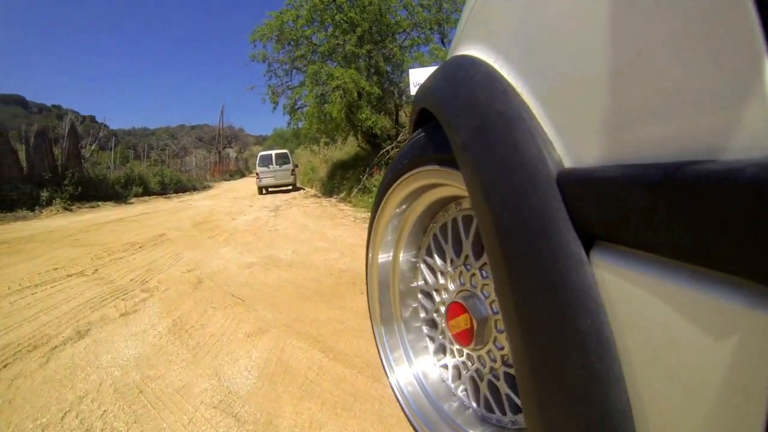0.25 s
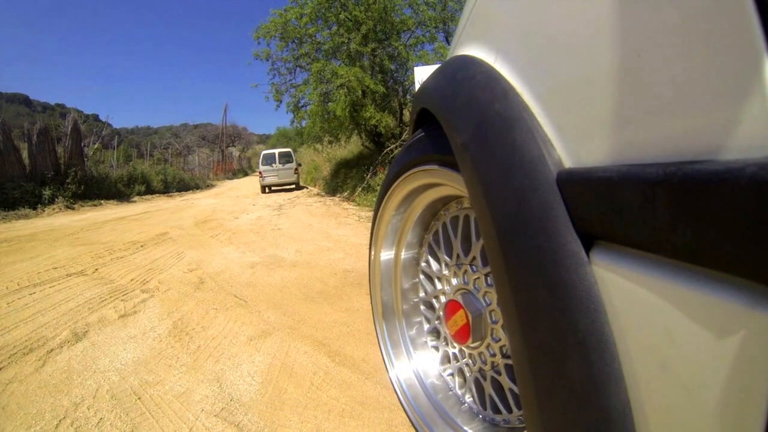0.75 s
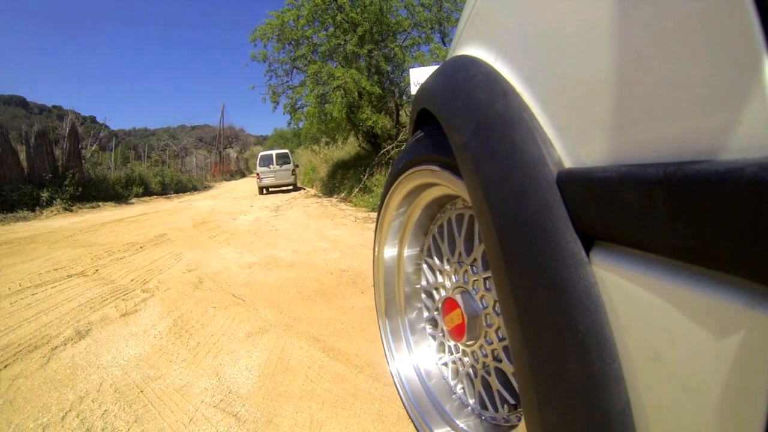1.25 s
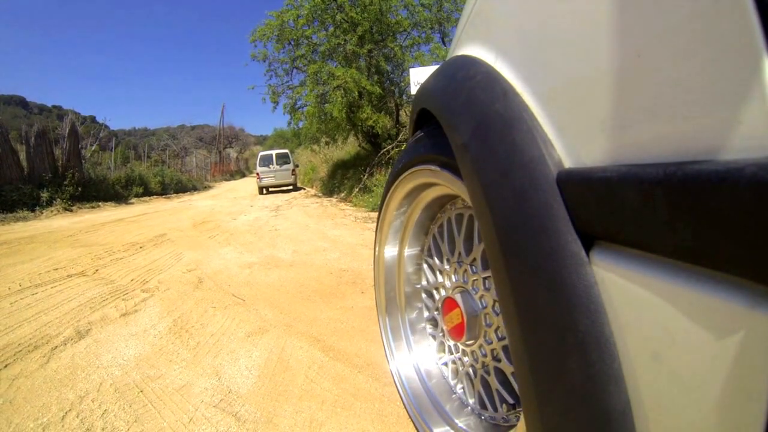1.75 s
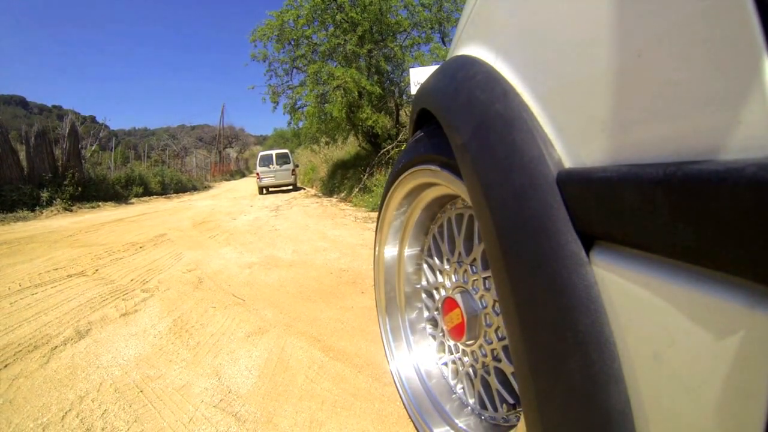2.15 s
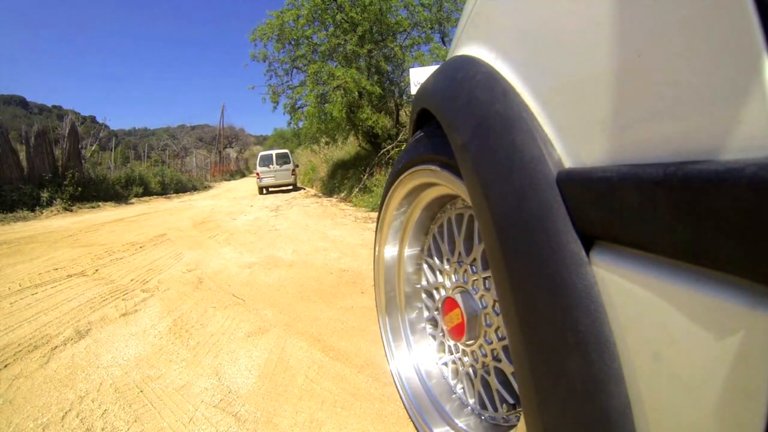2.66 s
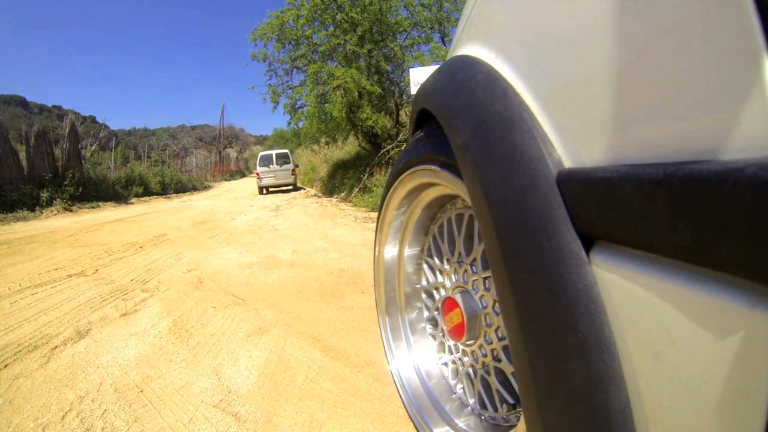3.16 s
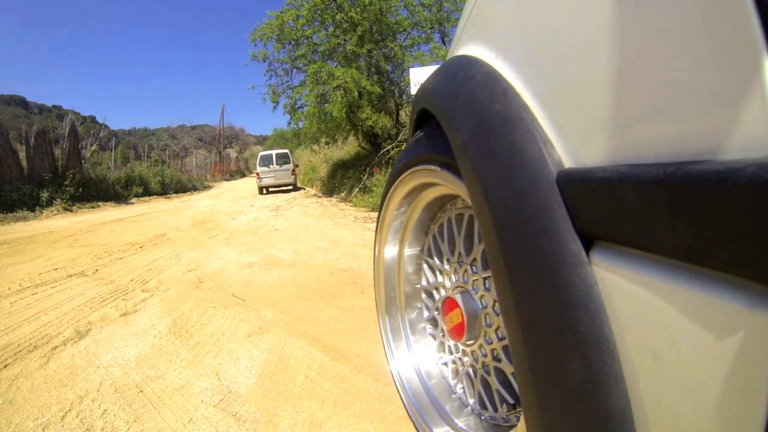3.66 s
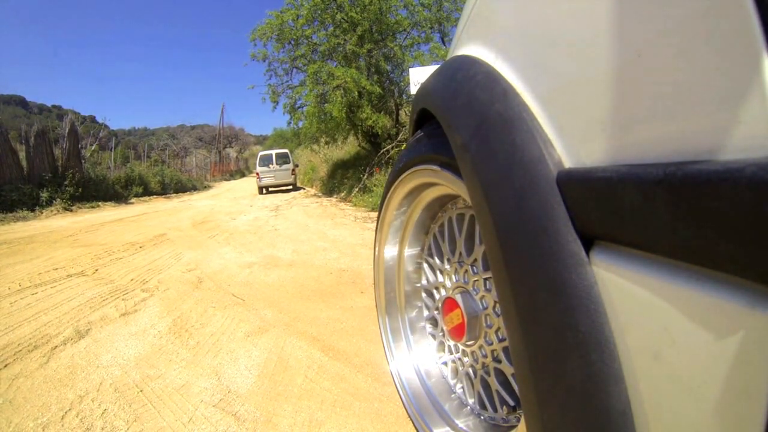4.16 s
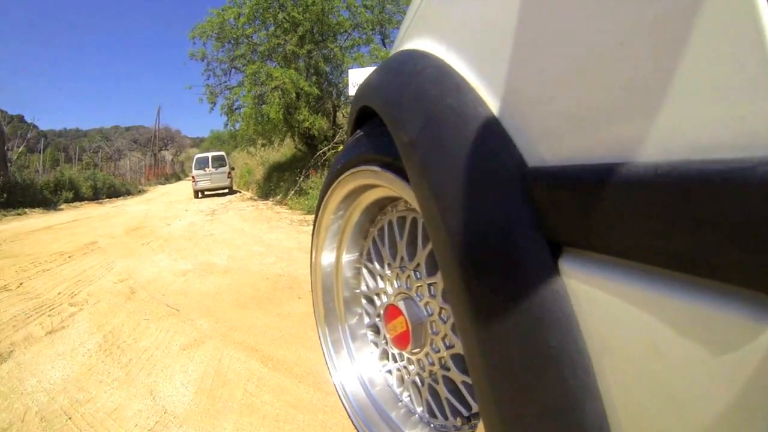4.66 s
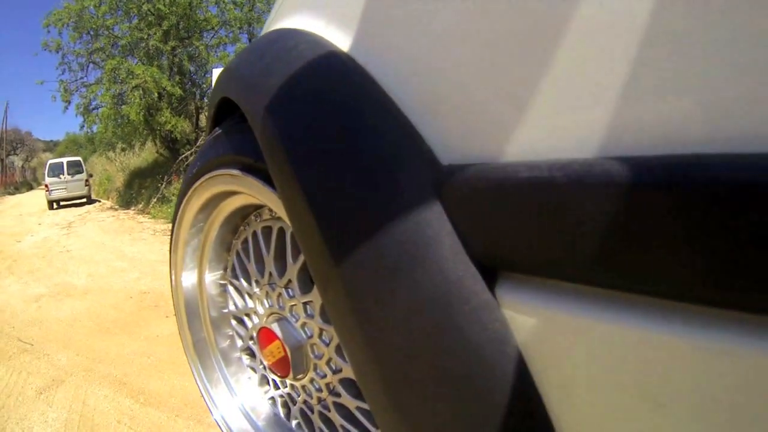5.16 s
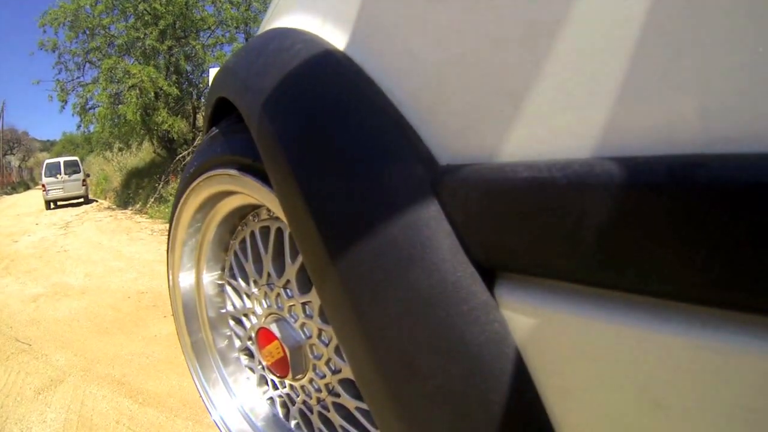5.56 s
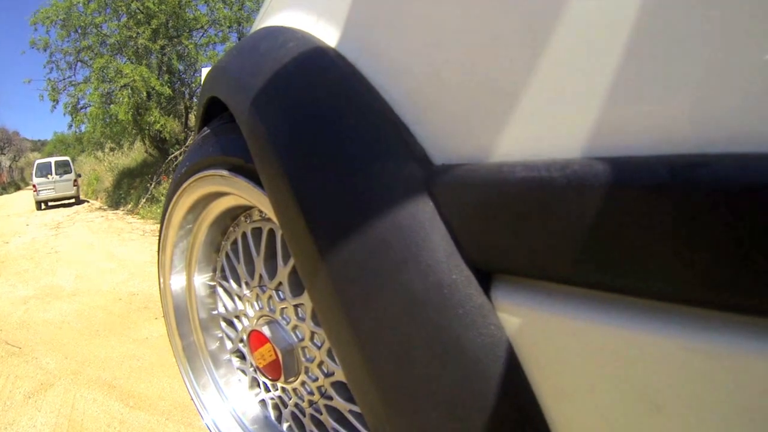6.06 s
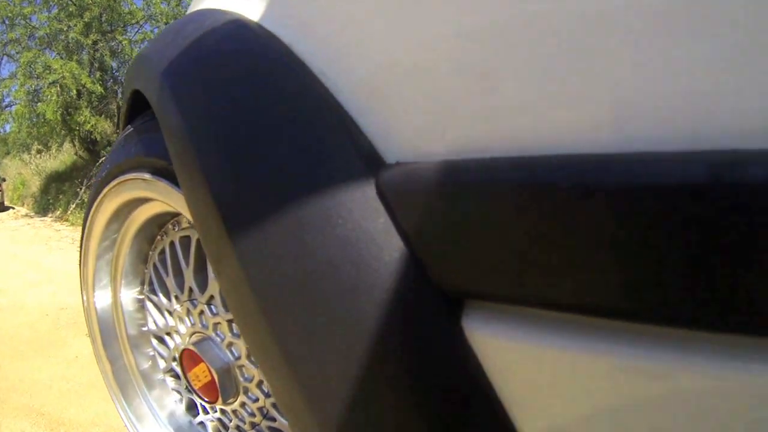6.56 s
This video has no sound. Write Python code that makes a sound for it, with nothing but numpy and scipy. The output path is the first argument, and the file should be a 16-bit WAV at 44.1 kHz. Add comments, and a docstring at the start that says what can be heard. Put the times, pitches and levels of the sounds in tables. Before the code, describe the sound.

Heard close to the wheel, a slow car rumbles along a sandy track, thumping and clattering over a rough patch before settling.

```python
"""A car creeps along a dirt road, heard from a cased camera fixed to its side, close to a wheel.
The engine throbs low from the start, under the camera's faint hiss and thin pulsing whine.
After one dab of throttle the tyres scrub into loose sand, about a second in; ruts begin to thump
the body and the camera mount knocks. From 3.5 s the road is roughest: the mount rattles, gravel
scrapes and pebbles tap the wheel arch. By 6 s the car is rolling quietly at idle."""
import sys
import numpy as np
from scipy import signal
from scipy.fft import rfft, irfft
from scipy.io import wavfile
from scipy.ndimage import uniform_filter1d

SR = 44100
rng = np.random.default_rng(int(sys.argv[2]) if len(sys.argv) > 2 else 0)


def wav_out(sig):
    """Save sig, one row per channel (or a flat mono array), as 16-bit PCM at SR to the path in sys.argv[1]."""
    wavfile.write(sys.argv[1], SR, np.round(np.clip(np.atleast_2d(sig).T, -1, 1) * 32767).astype(np.int16))


N = 300850
TIME = np.arange(N) / SR
IDLE_HZ = 27.41  # firings per second

# Ruts under the wheel. Each row: start in seconds, level in dB, centre of the blow in Hz.
RUTS = [(1.276, -31.5, 103), (1.455, -40, 103), (1.68, -36.5, 111), (1.825, -31.5, 96), (1.857, -31.5, 95),
        (1.963, -35.5, 88), (2.183, -37.5, 105), (3.185, -36, 89), (3.255, -35.5, 93), (3.317, -39.5, 96),
        (3.555, -19.5, 152.5), (3.567, -23, 210), (3.737, -32.5, 97.5), (3.881, -35, 113),
        (4.059, -36.5, 104.9), (4.277, -22.5, 110.7), (4.3037, -20.5, 107.3), (4.379, -33, 87),
        (4.644, -29, 97), (4.704, -34, 96), (4.973, -30, 92), (5.048, -32, 218), (5.072, -33.5, 97),
        (5.307, -37.5, 226)]
# The hollow lows and clacking mids of the camera case. Each row: frequency in Hz, level in dB.
HOLLOW_SPECTRUM = [(150, -20.5), (300, 4.5), (380, 0), (450, 7), (520, -7), (620, 0.5), (700, 2.5),
                   (830, -11.5), (950, -13.5), (1200, -21.5)]
CLACK_SPECTRUM = [(700, -32.5), (1020, -6), (1240, 9.5), (1400, 7), (1520, 5.5), (1620, 5), (1800, -9.5),
                  (1960, -1.5), (2300, -16.5), (2800, -47)]


def amp(db):
    """Decibels to gain."""
    return 10 ** (np.asarray(db) / 20)


def unit(x):
    """Scales to rms 1."""
    return x / np.sqrt(np.mean(x ** 2) + 1e-20)


def curve(rows):
    """Joins (seconds, value) points, sample by sample."""
    return np.interp(TIME, *np.transpose(rows))


def add(mix, start_s, sound):
    """Mixes a sound in at its start time."""
    part = mix[max(round(start_s * SR), 0):][:len(sound)]
    part += sound[:len(part)]


def colour(x, spectrum, size=4096):
    """Causal filter of unit energy with the given spectrum, falling steeply beyond its ends."""
    hz, db = np.transpose(spectrum)
    f = abs(np.fft.fftfreq(size, 1 / SR)) + 1
    octaves_out = np.maximum(np.log2(hz[0] / f), 0) + np.maximum(np.log2(f / hz[-1]), 0)
    log_gain = np.log(amp(np.interp(np.log(f), np.log(hz), db) - 20 * octaves_out))
    minimum_phase = np.exp(signal.hilbert(log_gain).conj())
    taps = np.fft.ifft(minimum_phase).real[:size // 2]
    return signal.fftconvolve(x, taps / np.linalg.norm(taps))[:len(x)]


def waver(rate_hz):
    """Random drift of rms 1, mostly slower than the given rate."""
    f = np.fft.rfftfreq(N, 1 / SR)
    return unit(irfft(rfft(rng.standard_normal(N)) / (1 + (f / rate_hz) ** 4), N))


def ring(modes, t):
    """Sum of dying modes, each given as Hz, dB and t60 in seconds."""
    return sum(amp(db) * np.exp(-np.log(1000) * t / t60) * np.sin(2 * np.pi * hz * t)
               for hz, db, t60 in modes)


def grains(per_s, spread_db):
    """Random clicks of uneven size."""
    size = amp(spread_db * np.minimum(rng.exponential(1, N), 5))
    return unit(size * rng.standard_normal(N) * (rng.random(N) < per_s / SR))


def firing_rate(top_s=.56, up_s=.45, down_s=.7, rise_hz=7.6, hunt_hz=.3):
    """The idle hunts a little, with one smooth rise and fall under the throttle."""
    dab = np.interp(TIME, [top_s - up_s, top_s, top_s + down_s], [-1, 0, 1])
    return IDLE_HZ + rise_hz * np.cos(np.pi / 2 * dab) ** 2 + hunt_hz * waver(2.5)


def engine(boom_hz=93.6, boom_width_hz=30.8):
    """Orders of the firing rate, no two firings quite equal, over muffled engine bay noise."""
    # The deep throb: the engine's firing, plus the body's heave in the deep rut near 4.3 s.
    # Each row: time in seconds, level in dB.
    throb_levels = [(0.0, -42.5), (0.36, -50.5), (0.46, -38), (1.37, -46.5), (2.05, -46), (2.09, -51),
                    (2.85, -42.5), (3.32, -51), (4.21, -41), (4.33, -29.5), (4.48, -46.5), (5.01, -40),
                    (5.17, -53), (5.26, -42.5), (6.19, -43), (6.53, -53), (6.65, -45.5), (6.82, -46.5)]
    # Engine load. Each row: time in seconds, level of the second order in dB.
    load_levels = [(0, -60.5), (.75, -62), (1.05, -58), (2.05, -57.5), (2.3, -58), (2.9, -55.5), (3.5, -58),
                   (4.3, -51), (4.9, -64), (6.82, -68)]
    # Orders that boom in the body, and fainter ones that hum. Each row: order, level in dB.
    drone_orders = [(3, 2.5), (4, -2), (5, -8)]
    hum_orders = [(6, -82.5), (7, -82), (8, -79), (10, -92.5), (11, -78.5), (13, -82), (15, -81.5)]
    # Noise of the engine bay. Each row: frequency in Hz, level in dB.
    bay_spectrum = [(200, -1.5), (330, 5), (430, -2), (520, -2.5), (700, -3), (950, -11), (1400, -15.5),
                    (1900, -13.5)]
    hz = firing_rate()
    angle = 2 * np.pi * np.cumsum(hz) / SR
    load_db = curve(load_levels)
    tones = amp(curve(throb_levels) + 1.9 * waver(6.4)) * np.sin(angle + .2 * waver(21))
    tones += amp(load_db + 2 * waver(4.3)) * np.sin(2 * angle + .22 * waver(1.3))
    drone_db = -55 + .55 * (load_db + 59.5)  # follows about half the load's swing
    for order, db in drone_orders:
        boom = 1 / np.hypot(1, 2 * (order * hz - boom_hz) / boom_width_hz)  # the body's resonance
        wave = np.sin(round(order) * angle + .5 * waver(7))
        tones += boom * amp(db + drone_db + 2 * waver(12)) * wave
    fade_db = -1.2 * np.maximum(hz - IDLE_HZ, 0)  # the hum fades as the engine speeds up
    for order, db in hum_orders:
        gain = amp(db + fade_db + 2 * waver(9.9))
        tones += gain * np.sin(round(order) * angle + 2 * np.pi * rng.random() + .41 * waver(21))
    bay = colour(rng.standard_normal(N) * (1 + .093 * np.cos(angle)), bay_spectrum)
    bay_db = -74.5 + .18 * (hz - IDLE_HZ)
    return np.sqrt(2) * tones + amp(bay_db) * bay


def camera(pulse_hz=14.984, hiss_db=-81):
    """Even hiss, and an electronic whine with its octave that pulses on and off."""
    # The camera's own hiss. Each row: frequency in Hz, level in dB.
    hiss_spectrum = [(1000, -1.5), (2500, -2.5), (4000, -7), (6000, -11), (8000, -14.5), (11500, -17.5),
                     (13500, -20.5), (14500, -33)]
    cycle = (TIME * pulse_hz + .07) % 1
    gate = uniform_filter1d((cycle < .55) * 1., size=90) * amp(2.3 * waver(60))
    whine_hz = 7490 - 110 * cycle + 35 * waver(200)
    angle = 2 * np.pi * np.cumsum(whine_hz) / SR
    whine = gate * (amp(-92.5) * np.sin(angle) + amp(-82.5) * np.sin(2 * angle))
    return whine + amp(hiss_db) * colour(rng.standard_normal(N), hiss_spectrum)


def tyres(shake, patch_s=1.1462, hold_s=.52, rise_db_per_s=78, fade_db_per_s=13.5):
    """Lumps in the dirt shake the body; crushed sand scrubs in the case's resonance."""
    # Road rumble and sand scrub. Each row: frequency in Hz, level in dB.
    rumble_spectrum = [(24, -2), (40, 4.5), (65, 3), (84, 12.5), (98, 16.5), (115, 10), (172, -6.5),
                       (222, 4.5), (270, -9), (450, -18), (560, -13.5), (700, -25.5), (950, -34)]
    scrub_spectrum = [(300, -19.5), (550, -17.5), (790, -12.5), (1000, -13), (1200, 1.5), (1400, 3),
                      (1620, -5.5), (1850, -23.5), (2170, -12.5), (2500, -36.5), (3600, -33.5),
                      (4300, -49.5)]
    patch_db = -57.5 - rise_db_per_s * np.maximum(patch_s - TIME, 0)  # into a patch of loose sand
    patch_db -= fade_db_per_s * np.maximum(TIME - patch_s - hold_s, 0)
    # Steady rolling, the patch and the shake from the ruts add in power.
    scrub_gain = amp(-1.5) * np.sqrt(amp(-73) ** 2 + amp(patch_db) ** 2 + (amp(-13) * shake) ** 2)
    rumble_gain = amp(10) * np.sqrt(amp(-71) ** 2 + amp(patch_db - 15) ** 2 + shake ** 2)
    lumps = colour(grains(per_s=1500, spread_db=2.2), rumble_spectrum) * amp(2.2 * waver(20))
    sand = colour(grains(per_s=8000, spread_db=.75), scrub_spectrum) * amp(1.2 * waver(18))
    return rumble_gain * lumps + scrub_gain * sand


def shudder(rise_s=.013, decay_s=.14):
    """Envelope of the car's shaking: each rut starts it in proportion to its blow, and it dies away."""
    power = np.zeros(N)
    for start_s, db, _ in RUTS:
        t = np.maximum(TIME - start_s, 0)
        power += (amp(db) * (1 - np.exp(-t / rise_s)) * np.exp(-t / decay_s)) ** 2
    return amp(-28.5) * np.sqrt(power)


def rut_thumps():
    """Each rut rings the body modes nearest to the centre frequency of its blow."""
    # Modes of body and tyre. Each row: frequency in Hz, level in dB, t60 in seconds.
    body_modes = [(62.3, -15.5, 0.1), (90.5, -4.5, 0.3), (98.3, 7.5, .24), (122, -4.5, 0.13),
                  (143.3, 0.5, 0.13), (203.9, 4.5, 0.29), (220.6, 6.5, 0.21), (310, -22, 0.4),
                  (442, -17, 0.15)]
    out, t = np.zeros(N), np.arange(SR // 2) / SR
    for start_s, db, centre_hz in RUTS:
        modes = [(hz, level - 15.2 * np.log2(hz / centre_hz) ** 2, t60) for hz, level, t60 in body_modes]
        thump = ring(modes, t) * (1 - np.exp(-(t / .0082) ** 2))  # the rubber softens the attack
        add(out, start_s, amp(db - 1) * thump / abs(thump).max())
    return out


def mount_knocks(chatter_t60_s=.1):
    """One hard clack, then the mount chatters in a quickly dying burst, and the case rings on."""
    # Knocks of the mount. Each row: start in seconds, level in dB, pitch in Hz, dullness in dB.
    knocks = [(1.823, -43, 1260, -2.5), (2.578, -55, 1290, -9), (3.505, -46, 1310, 4),
              (3.553, -31.5, 1253, 4.5), (3.5744, -43, 1250, 9), (4.241, -34.5, 1220, -6),
              (4.2495, -34, 1390, -4.5), (4.2801, -29, 1293, -2.5), (4.3284, -39.5, 1610, -5.5),
              (4.3862, -38.5, 1190, -1.5), (4.424, -39, 1414, 1), (4.467, -40.5, 1290, -6.5),
              (4.5017, -31.5, 1644, -8.5), (4.5118, -37.5, 1680, 2), (5.027, -52, 1450, 12.5),
              (5.0853, -58, 1380, -5), (5.1167, -54, 1420, -12.5), (5.3075, -50, 1390, 5.5),
              (5.9899, -68.5, 1280, 13), (6.4838, -61.5, 1320, 5.5)]
    # Modes of the camera case. Each row: frequency in Hz, level in dB, t60 in seconds.
    case_modes = [(448, 1, 0.24), (645, -9.5, 0.26), (750, -6.5, 0.099), (937, 1, 0.12), (1227, -8, 0.16),
                  (1326, -4, 0.16), (1418, -1.5, 0.18), (1662, -1.5, 0.17), (2186, -7.5, 0.13)]
    # A knock's bright edge. Each row: frequency in Hz, level in dB.
    edge_spectrum = [(1800, -10.5), (2250, 8), (2550, -3.5), (2850, -7.5), (3200, -6.5), (3400, -2),
                     (3750, -1.5), (4000, -14.5), (4300, -26), (6000, -39.5)]
    out, t = np.zeros(N), np.arange(SR // 2) / SR
    attack = 1 - np.exp(-t / .00074)
    burst = attack * np.exp(-np.log(1000) * t / chatter_t60_s)
    for start_s, db, clack_hz, dull_db in knocks:
        low, mid, high = rng.standard_normal((3, len(t)))
        modes = [(hz, level + 2 * rng.standard_normal(), t60) for hz, level, t60 in case_modes]
        clack = attack * (ring([(clack_hz, 5, .035)], t) + amp(-11.5) * ring(modes, t))
        chatter = amp(-1.5) * colour(mid * burst, CLACK_SPECTRUM)
        hollow = amp(-2.5 + dull_db) * colour(low * burst ** .5, HOLLOW_SPECTRUM)  # dies half as fast
        edge = amp(-22 - dull_db) * colour(high * burst * attack, edge_spectrum)
        add(out, start_s, amp(db - 6) * (clack + chatter + hollow + edge))
    return out


def gravel_scrapes(half_length_s=.031):
    """Gravel gives way under the tyre in soft swells of crushed grains, heard through the hollow case."""
    # Each row: time of the scrape's top in seconds, level in dB.
    scrapes = [(3.815, -64), (3.905, -63.5), (4.09, -68.5), (4.658, -61.5), (4.71, -62.5), (4.974, -60),
               (5.06, -61.5), (5.235, -69.5)]
    swell = sum(amp(db) * np.exp(-((TIME - top_s) / half_length_s) ** 2) for top_s, db in scrapes)
    crunch = grains(per_s=5000, spread_db=1.4)
    return swell * (colour(crunch, CLACK_SPECTRUM) + amp(-.5) * colour(crunch, HOLLOW_SPECTRUM))


def pebble_taps():
    """A flicked stone gives a dry tap on the plastic wheel arch and sets the metal behind it ringing."""
    # Each row: start in seconds, tap level in dB, tap pitch in Hz, ring level in dB.
    pebbles = [(4.4492, -32, 1180, -70), (4.489, -41.5, 1780, -54), (4.744, -45, 1380, -88),
               (5.3078, -35.5, 1405, -74.5), (5.469, -48, 1330, -88), (5.479, -43.5, 1290, -90)]
    # Modes of the metal. Each row: frequency in Hz, level in dB, t60 in seconds.
    metal_modes = [(2910, -10, 0.31), (3660, 7, 0.033), (3820, -11, .06), (4900, -10, .025),
                   (5650, -11, 0.022), (6760, -14, 0.022), (7900, -13.5, 0.022)]
    out, t = np.zeros(N), np.arange(SR // 2) / SR
    attack = 1 - np.exp(-t / .0017)
    for start_s, tap_db, tap_hz, ring_db in pebbles:
        tap = ring([(tap_hz, 0, .025), (1.1 * tap_hz, -4, .018)], t)
        add(out, start_s, attack * (amp(tap_db) * tap + amp(ring_db) * ring(metal_modes, t)))
    return out


def scene():
    """Everything reaches one microphone through the body and the case."""
    rolling = engine() + tyres(shudder()) + gravel_scrapes()
    return (rolling + rut_thumps() + mount_knocks() + pebble_taps() + camera())[None]


def record(dry, cutoff_hz=15400):
    """The camera's band limit cuts the highest treble."""
    lowpass = signal.firwin(511, cutoff_hz, window=("kaiser", 9), fs=SR)
    return signal.oaconvolve(dry, lowpass[None], "same")


dry = scene()
out = record(dry)
wav_out(out)
```